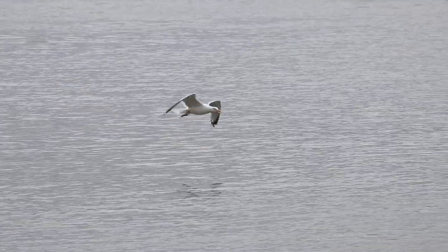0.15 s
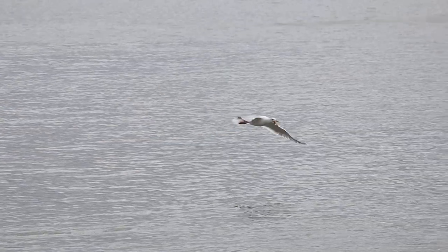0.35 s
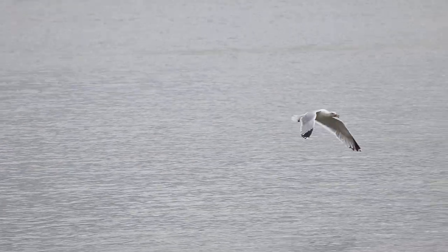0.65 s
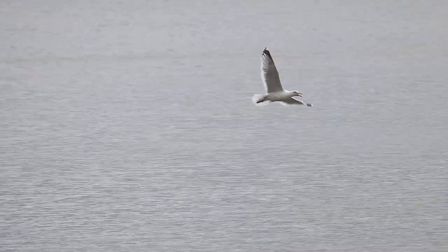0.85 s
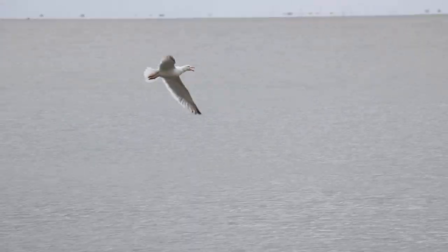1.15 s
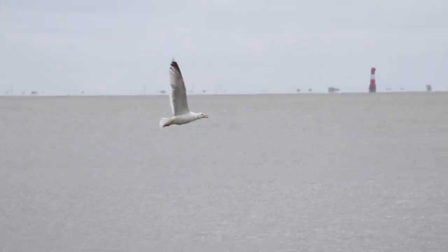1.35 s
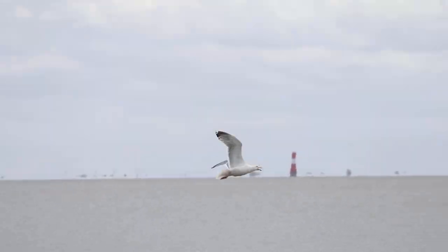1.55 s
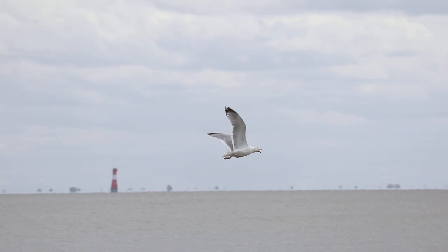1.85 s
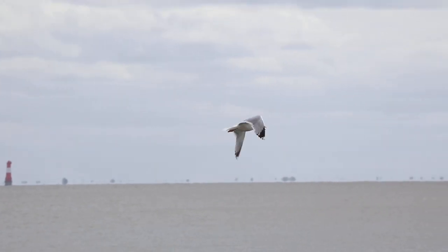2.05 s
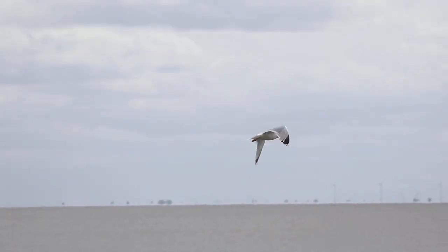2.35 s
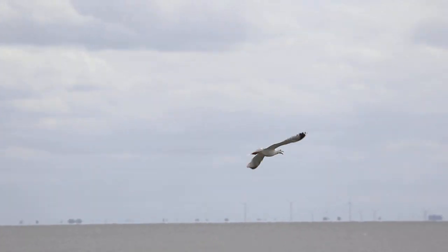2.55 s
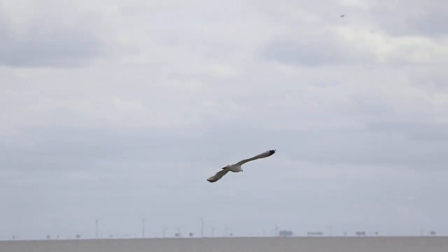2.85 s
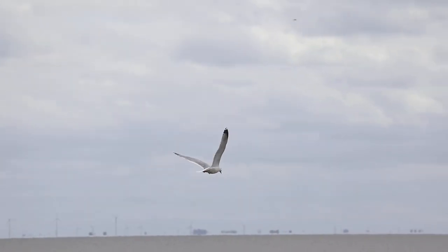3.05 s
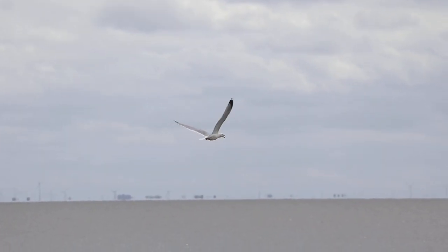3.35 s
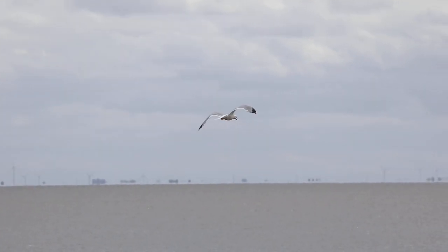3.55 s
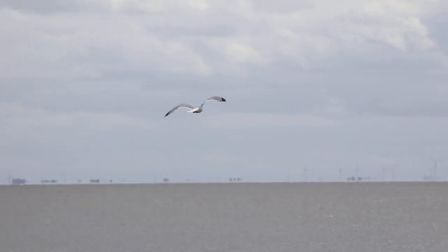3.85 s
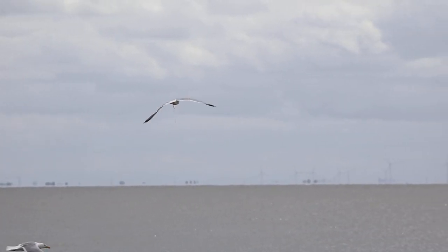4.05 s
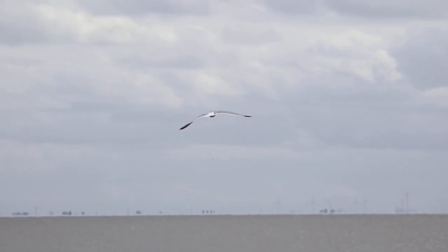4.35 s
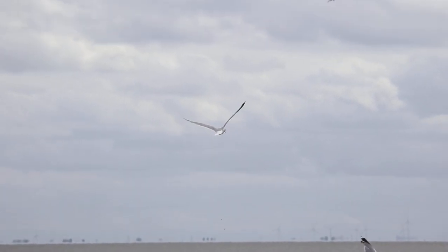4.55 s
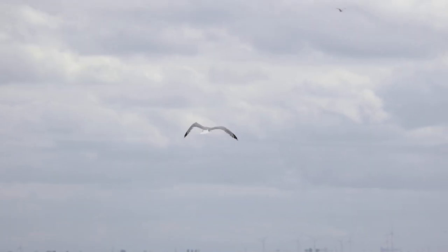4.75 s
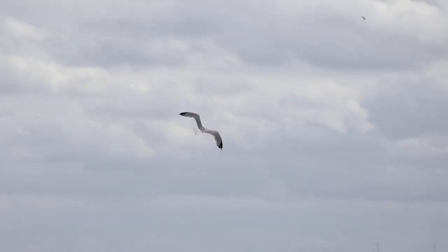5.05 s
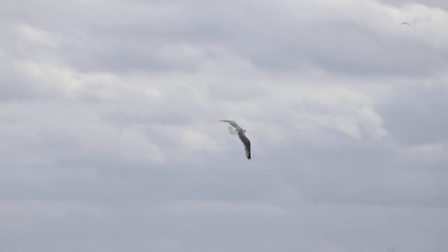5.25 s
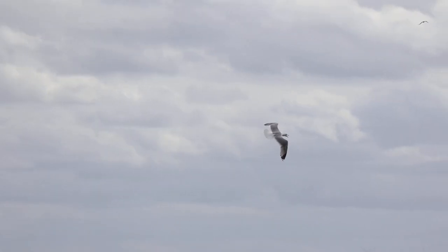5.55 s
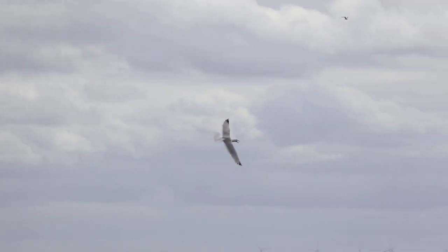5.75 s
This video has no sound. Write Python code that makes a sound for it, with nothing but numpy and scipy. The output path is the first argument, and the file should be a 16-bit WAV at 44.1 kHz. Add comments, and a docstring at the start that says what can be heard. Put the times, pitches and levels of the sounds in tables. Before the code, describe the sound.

Repeated yelping gull calls, each dropping in pitch and breaking hoarsely, over rough low wind rumble and a thin wash of small waves.

```python
"""From the start a gull cries over open water, about every 0.7 s; a second joins at 3.8 s.
Most cries open with a yelp, break on hoarse half lines, hold a falling note and end low; lines are summed sines.
Wind buffets the microphone throughout, hardest near 1 s: shaped noise, pops, spikes and swings.
Small waves hiss wide underneath: noise shaped in time and frequency."""
import sys
import numpy as np
from scipy import signal
from scipy.fft import rfft, irfft, next_fast_len
from scipy.io import wavfile
from scipy.ndimage import uniform_filter1d

SR = 44100
rng = np.random.default_rng(int(sys.argv[2]) if len(sys.argv) > 2 else 0)


def persist_wave(psi):
    """Save psi, clipped to +-1, as 16-bit WAV."""
    counts = np.round(np.clip(psi, -1, 1) * 32767).astype(np.int16)
    wavfile.write(sys.argv[1], SR, np.atleast_2d(counts).T)


N = 259749

# Waves. Each row: time in seconds, relative level in dB, brightness in dB per octave about 3 kHz,
# narrowness in dB (lowers the sides at 3 kHz, less so above).
WAVES = [(0, -52, 2.5, 0.5), (.15, -55, 2.5, 0), (.33, -54, 2, .1), (.9, -53.5, 1.8, -2),
         (1.08, -54.5, 1, -3.5), (1.13, -51, 2.5, -1), (1.24, -47, 4, 3), (1.32, -49.5, 3, -1),
         (1.4, -53.5, 2, -5), (1.6, -52, 2.8, 1), (1.72, -50, 3.2, 2), (1.95, -55, 3, -2),
         (2.3, -53.5, 2, -0.5), (2.551, -54, 2.3, -1.5), (3.0, -55.5, 3, -1.5), (3.3, -55.5, 2.4, -3),
         (3.6, -55.5, 2, -4), (4.0, -55, 1.5, -6), (4.4, -55.5, 2.5, -5.5), (4.8, -55.5, 1.5, -5.5),
         (5.2, -54, 2.5, -5), (5.5, -55, 1.5, -6), (5.89, -53.5, 2.5, -5)]
# Mid and side spectra of the waves. Each row: frequency in Hz, relative density in dB per Hz.
WAVES_MID = [(35, -8), (60, -4.5), (91, -1), (167, 3), (356, -12.5), (587, -18), (1490, -20), (1820, -27),
             (3060, -32), (7450, -49), (8130, -51.5), (9880, -61.5), (10800, -64.5), (14000, -118),
             (22000, -120)]
WAVES_SIDE = [(59, -91.5), (100, -46.5), (176, -27), (246, -12.5), (318, -18.5), (560, -14.5), (1200, -15),
              (1550, -14.5), (2630, -16.5), (4640, -22.5), (10800, -35), (14000, -43.5), (22000, -120)]
PATCH_RMS_DB = 1.1  # unevenness of the hiss

# Wind at the microphone. Each row: time in seconds, relative level in dB,
# sharpness as relative dB of the upper band against the level.
GUSTS = [(0.0, -44, -11), (0.05, -33.5, -21), (0.21, -43.5, -10.5), (0.49, -29, -21), (0.57, -38.5, -8.5),
         (0.59, -24.5, -19.5), (0.69, -27, -11.5), (0.72, -32.5, -22.5), (0.9, -30.5, -21.5),
         (0.949, -23, -5.5), (0.97, -35.5, -22), (1.0, -18, -16), (1.049, -14, -7), (1.111, -18, -8.5),
         (1.15, -29.5, -18.5), (1.28, -22.5, -13.5), (1.31, -42, -16.5), (1.35, -21, -12),
         (1.46, -23, -11.5), (1.54, -26.5, -24.5), (1.57, -36, -22), (1.79, -20.5, -12),
         (1.951, -32, -18.5), (2.0, -20, -13), (2.12, -26.5, -19), (2.17, -23, -13.5), (2.31, -33, -18),
         (2.66, -23, -9.5), (2.87, -25.5, -16), (2.889, -36.5, -13), (3.0, -36, -17), (3.02, -29, -19),
         (3.2, -28, -19), (3.225, -39, -17), (3.25, -37, -18), (3.26, -27.5, -19), (3.3, -37.5, -17),
         (3.39, -37, -20), (3.43, -25.5, -24), (3.51, -30.5, -9), (3.53, -24, -21), (3.71, -30, -18),
         (3.76, -24.5, -28), (3.82, -28.5, -16), (3.94, -25.5, -25), (3.99, -26.5, -15.5),
         (4.04, -19.5, -24.5), (4.17, -43.5, -8.5), (4.35, -46, -5), (4.38, -29.5, -22.5), (4.41, -30, -22),
         (4.425, -37, -21), (4.555, -37, -20), (4.575, -24, -22.5), (4.62, -24, -21), (4.635, -33, -23),
         (4.655, -26, -23), (4.71, -25, -21), (4.72, -35.5, -23), (4.81, -26.5, -20.5), (4.92, -40.5, -18),
         (5.081, -37, -19), (5.12, -35, -20), (5.135, -23, -19), (5.19, -25, -22), (5.205, -37, -22),
         (5.25, -32, -24), (5.38, -38, -16.5), (5.51, -25, -28), (5.54, -38.5, -14), (5.69, -24.5, -27),
         (5.82, -46.5, -3.5), (5.89, -42.5, -7)]
# Single buffets. Each row: time in seconds, relative spike peak in dB, nominal first pitch of the swings in Hz,
# relative level of the swings in dB.
BUFFETS = [(0.047, -36, 135, -32), (0.113, -33, 253, -34.5), (0.145, -39, 175, -41), (0.267, -40, 132, -37),
           (0.302, -38, 207, -37), (0.375, -26, 363, -33), (0.413, -35, 137, -33), (0.429, -30, 128, -30),
           (0.472, -25, 334, -25), (0.507, -25, 202, -28), (0.536, -30, 132, -31), (0.593, -22, 286, -19),
           (0.624, -24, 318, -22.5), (0.64, -17, 280, -23), (0.665, -21, 245, -26), (0.84, -31, 291, -27.5),
           (0.881, -36, 148, -29), (0.926, -23, 235, -23.5), (0.939, -14, 245, -24.5),
           (0.972, -26, 194, -22), (0.995, -21, 331, -21), (1.004, -14, 202, -16), (1.014, -16, 260, -19),
           (1.036, -8, 249, -15), (1.049, -13, 300, -17), (1.073, -11.5, 247, -16), (1.09, -7, 370, -14),
           (1.112, -14, 280, -18), (1.165, -23, 221, -26), (1.203, -19, 260, -24.5), (1.253, -17, 266, -22),
           (1.274, -21, 374, -25), (1.347, -17, 366, -19), (1.364, -12, 460, -24), (1.384, -18, 237, -24),
           (1.393, -15, 330, -22), (1.418, -17.5, 225, -22.5), (1.449, -11, 326, -22),
           (1.474, -21, 300, -23), (1.493, -19, 235, -24), (1.541, -32, 188, -26), (1.586, -32, 121, -33),
           (1.61, -36, 140, -30), (1.636, -34, 153, -27), (1.651, -28, 277, -26),
           (1.712, -17.5, 234, -24.5), (1.754, -18, 450, -20.5), (1.766, -21, 330, -22),
           (1.777, -17, 300, -20), (1.806, -18, 183, -22), (1.826, -24, 300, -28), (1.859, -19.5, 269, -20),
           (1.885, -22, 191, -22.5), (1.94, -34, 191, -30), (1.97, -26, 210, -25), (1.989, -16.5, 246, -20),
           (2.006, -19, 240, -22), (2.019, -18, 260, -21), (2.037, -23, 220, -25), (2.066, -21, 229, -26),
           (2.101, -23, 230, -25), (2.126, -23, 304, -25), (2.149, -21, 409, -23), (2.166, -20, 300, -22),
           (2.188, -22, 280, -24), (2.218, -24, 370, -28), (2.271, -30, 223, -30), (2.317, -26, 345, -32),
           (2.347, -27, 196, -30.5), (2.37, -20, 151, -26.5), (2.402, -26, 409, -29.5),
           (2.494, -21, 282, -25), (2.517, -23, 300, -26), (2.539, -16, 536, -21.5),
           (2.566, -22, 304, -22.5), (2.629, -14, 281, -23.5), (2.643, -19, 330, -23),
           (2.661, -15.5, 409, -26), (2.684, -18, 428, -25), (2.697, -20, 260, -24), (2.719, -21, 250, -24),
           (2.738, -19, 280, -23), (2.757, -21, 260, -24), (2.77, -20, 260, -23), (2.786, -19, 230, -22),
           (2.815, -26, 300, -28), (2.855, -20.5, 406, -21.5), (2.908, -30, 148, -31),
           (2.946, -37, 258, -32), (3.013, -26, 198, -25), (3.044, -28, 315, -29), (3.073, -30, 350, -34),
           (3.104, -27, 221, -30), (3.144, -29.5, 275, -27), (3.165, -26, 310, -27.5),
           (3.184, -24, 215, -27), (3.241, -35, 159, -32), (3.256, -25, 210, -28), (3.305, -34, 277, -30),
           (3.324, -27, 300, -30), (3.427, -20, 374, -24), (3.458, -25.5, 229, -28), (3.502, -20, 304, -25),
           (3.525, -27, 153, -22.5), (3.545, -26, 175, -25.5), (3.576, -24, 200, -26),
           (3.603, -26, 191, -26.5), (3.638, -24, 229, -25.5), (3.66, -28, 156, -25),
           (3.696, -28, 178, -29.5), (3.736, -30, 229, -25.5), (3.751, -27, 205, -26.5),
           (3.78, -27, 226, -25.5), (3.807, -22, 336, -28), (3.833, -34, 215, -29),
           (3.934, -30.5, 220, -26), (3.981, -18.5, 179, -21.5), (4.009, -15, 153, -20.5),
           (4.029, -19, 230, -21), (4.052, -21, 361, -20.5), (4.192, -41, 385, -46), (4.373, -31, 183, -29),
           (4.453, -37, 148, -31), (4.506, -36, 156, -32), (4.565, -24, 207, -19), (4.605, -23, 202, -19),
           (4.657, -27, 156, -23), (4.693, -20, 323, -19), (4.75, -33, 283, -28.5), (4.802, -23, 158, -25),
           (4.842, -37, 194, -32.5), (4.987, -33, 151, -34), (5.0, -29, 390, -34), (5.039, -34, 285, -34),
           (5.093, -32.5, 183, -24), (5.131, -21, 204, -22), (5.147, -23, 200, -24),
           (5.173, -21, 152, -22.5), (5.259, -29, 165, -27.5), (5.326, -35, 180, -28.5),
           (5.434, -27, 253, -27), (5.498, -36, 223, -22.5), (5.59, -39, 213, -33), (5.611, -29, 167, -29),
           (5.626, -25, 167, -27.5), (5.686, -22, 277, -19), (5.721, -30, 164, -25.5),
           (5.77, -37, 186, -38)]
# Low and high wind bands. Each row: frequency in Hz, relative level in dB.
WIND_LOW = [(20, -40.5), (45, -21.5), (90, -6.5), (170, -0.5), (280, 0.5), (420, -6.5), (700, -52),
            (1200, -57.5)]
WIND_HIGH = [(150, -22), (300, -4.5), (450, 6.5), (650, -3.5), (900, -12), (1300, -29), (2000, -59)]
# Stereo difference of the wind. Each row: frequency in Hz, side against mid in dB.
WIND_SIDE = [(60, -60), (125, -36), (190, -32), (330, -18), (590, -12.5), (1050, -4)]
# Spectrum of one small eddy. Each row: frequency in Hz, relative level in dB.
POP_SPECTRUM = [(40, -31), (120, -9.5), (280, -2), (500, -4), (800, -12.5), (1300, -23), (2500, -62)]
# Band passed by the windscreen. Each row: frequency in Hz, gain in dB.
MEMBRANE = [(15, -38), (30, -16.5), (45, -2.5), (80, 3.5), (1100, -3), (1700, -15.5), (2600, -50.5),
            (4000, -96)]
GIVE = 0.85  # saturation limit of the membrane, ahead of its band filter
LUMP_LIMIT_DB = 7  # bound on the lumps of a gust before they are scaled to rms 1
CALM_DB = -35.5  # gust level below which the wind dies away quickly
BUFFET_T60_S = 0.032

# Yelps that open a cry. Each row: bird, start in seconds, end in seconds, first pitch in Hz, last pitch in Hz,
# partials 1, 2 and 3 in dB, half lines in dB, their dullness above the third in dB per line.
# Pitches and levels are bases for the courses below.
YELPS = [("first", .531, .555, 1270, 1500, -27.5, -42, -43, -43, 5),
         ("first", 1.25, 1.274, 1200, 1560, -32, -53, -60, -45, 8),
         ("first", 1.97, 2.0, 1150, 1470, -34.5, -43.5, -60, -47, 9),
         ("first", 2.653, 2.68, 1260, 1480, -29.5, -60, -79, -47, 4),
         ("first", 3.32, 3.348, 1233, 1420, -29.5, -49, -53, -57, 14),
         ("second", 3.838, 3.865, 1120, 1480, -54, -53, -66, -55, 12),
         ("first", 3.992, 4.016, 1260, 1390, -28, -43, -67, -49, 14),
         ("first", 4.735, 4.762, 1180, 1480, -34, -57, -78, -59, 15),
         ("second", 4.775, 4.796, 1200, 1450, -39, -52, -67, -55, 8),
         ("first", 5.355, 5.386, 1170, 1430, -33.5, -62, -75, -62, 15),
         ("second", 5.56, 5.586, 1210, 1460, -37, -60, -53, -51, 8),
         ("second", 5.815, 5.842, 1340, 1350, -35.5, -61, -52, -46, 9)]
# Hoarse breaks on half lines before the long note. Columns as for the yelps.
BREAKS = [("first", .558, .603, 1810, 1720, -42, -34, -59, -38.5, .1),
          ("first", .607, .626, 1640, 1630, -36.5, -29, -41.5, -54, 11),
          ("first", 1.278, 1.318, 1780, 1713, -38, -55, -77, -42, 14),
          ("first", 2.004, 2.023, 1610, 1625, -46.5, -41.5, -77, -47, 14),
          ("first", 2.683, 2.708, 1690, 1660, -55, -48, -72, -51, 9),
          ("first", 3.351, 3.388, 1680, 1660, -43, -67, -84, -52.5, 10),
          ("second", 3.87, 3.918, 1450, 1640, -48, -56, -62, -54, 12),
          ("first", 4.02, 4.058, 1610, 1570, -42, -49, -81, -53.5, 11),
          ("first", 4.766, 4.788, 1585, 1530, -41.5, -62, -70, -59, 15),
          ("second", 4.8, 4.853, 1610, 1640, -48, -57, -55, -49, 9),
          ("second", 5.59, 5.652, 1480, 1667, -46, -54, -51, -54.5, 12)]
# Low ends of a cry. Columns as for the yelps, then time in seconds at which the half lines set in.
ENDS = [("first", .182, .198, 1020, 900, -38, -42, -62, -49, 6, .183),
        ("first", .848, .887, 1050, 940, -40.5, -48, -50, -55, 8, .85),
        ("first", 1.57, 1.612, 1112, 970, -34, -50, -54, -50, 6, 1.583),
        ("first", 2.26, 2.356, 1099, 990, -34.5, -44, -45, -52, 3, 2.323),
        ("first", 2.968, 3.046, 1110, 940, -38, -52.5, -50, -52, 6, 3.015),
        ("first", 3.616, 3.68, 1098, 975, -39, -56.5, -51.5, -53, 6, 3.66),
        ("first", 4.353, 4.434, 1132, 980, -34.5, -56, -46, -53, 8, 4.414),
        ("first", 4.975, 5.066, 1093, 1035, -36, -51.5, -52.5, -60, 8, 5.058),
        ("first", 5.57, 5.682, 1103, 1030, -36, -56, -56, -56, 8, 5.665)]
# Course of each short register. Each row: share of its time, share of the glide, full lift in Hz,
# change in dB of partial 1, of the overtones, of the half lines.
YELP_COURSE = [(0, 0, 0, -12, -22, -22), (.2, .36, 5, -2, -5, -4), (.4, .48, 5.5, 0.5, -0.5, 0.5),
               (.72, 0.62, 5, 0.5, 0.1, -1), (.86, 0.75, -0.5, -6, -14, -15), (1, 1, 0.5, -11, -24, -24)]
BREAK_COURSE = [(0, 0, 0, -1, -4, -4), (.16, 0.1, 45, -1, -1.5, 0), (.7, 0.62, 28.5, -1, -0.5, 0),
                (1, 0.97, -0.5, 2, 2, -4.5)]
END_COURSE = [(0, 0, 0, -3, -4, -3), (.25, 0.378, 0, -0.5, 0.5, 0.1), (.58, 0.565, 0, -4, -3.5, 0.1),
              (.8, .7, 0, -8, -7, 0.1), (1, 1, 0, -15, -13, -5)]
ARCH_S = 0.045  # a register this long gets the full lift
FOURTH_DB = -16.5  # partial 4 against 3 in the short registers
CLEAR_DB = 22  # cut of the half lines while a low end is still clear
# Long falling notes. Each row: bird, partial 4 against 2 at start and at end in dB, half lines at start in dB,
# curve of (time in seconds, pitch in Hz, partials 1, 2 and 3 in dB).
NOTES = [ ("first", -22, -23, -66, [(0.0, 1605, -30.5, -34, -56), (0.106, 1430, -34, -46.5, -72),
         (0.118, 1406, -31.5, -43, -70), (0.148, 1342, -33, -45, -86), (0.158, 1315, -32.5, -57, -63),
         (0.17, 1252, -38, -73, -86), (0.178, 1253, -49, -75, -76)]),
         ("first", -27, -16.5, -62, [(0.63, 1607, -35, -35, -46), (0.638, 1603, -33.5, -32.5, -39),
         (0.678, 1574, -34.5, -33.5, -39.5), (0.764, 1479, -35, -34, -42), (0.78, 1454, -36.5, -37.5, -51),
         (0.792, 1396, -37, -46, -66), (0.81, 1315, -41, -51, -51), (0.832, 1282, -44, -56, -57),
         (0.845, 1256, -55, -65, -66)]), ("first", -33, -20, -52, [(1.322, 1626, -33, -41, -69),
         (1.33, 1611, -36, -39, -61), (1.406, 1567, -36.5, -45, -69), (1.428, 1546, -35, -42, -51.5),
         (1.496, 1490, -33, -44.5, -49.5), (1.538, 1416, -39, -41.5, -51), (1.558, 1340, -37, -53, -80),
         (1.567, 1320, -43, -66, -79)]), ("first", -42, -20, -70, [(2.027, 1590, -43, -38, -63),
         (2.039, 1567, -37.5, -36, -55), (2.111, 1524, -35.5, -38.5, -52), (2.167, 1462, -40, -38.5, -47.5),
         (2.201, 1400, -37.5, -48, -63), (2.223, 1360, -37, -57, -63), (2.251, 1283, -35, -59, -82),
         (2.257, 1260, -40, -71, -74)]), ("first", -40, -31, -67, [(2.712, 1655, -43, -43, -51),
         (2.73, 1590, -37, -43, -50), (2.752, 1556, -34.5, -42, -51), (2.8, 1550, -37, -47, -54),
         (2.818, 1535, -38, -54, -62), (2.894, 1355, -35, -55, -74), (2.944, 1305, -35, -58, -79),
         (2.965, 1295, -37, -68, -79)]), ("first", -26, -24, -58, [(3.392, 1586, -40, -54, -66),
         (3.402, 1580, -35.5, -54, -65), (3.42, 1570, -39, -66, -87), (3.436, 1550, -36.5, -51, -71),
         (3.506, 1485, -36.5, -47, -54.5), (3.584, 1401, -38, -40.5, -58), (3.6, 1350, -36, -43, -61),
         (3.613, 1297, -37, -60, -77)]), ("second", -37, -41, -54, [(3.922, 1630, -53, -48, -64),
         (3.94, 1540, -44, -34, -49), (3.96, 1435, -45, -37, -64), (3.992, 1363, -50, -48, -66),
         (4.045, 1290, -52, -58, -72)]), ("first", -42, -45, -71, [(4.062, 1522, -36, -52, -76),
         (4.076, 1508, -34.5, -49.5, -62), (4.13, 1501, -33.5, -46.5, -63), (4.228, 1499, -32, -46, -62),
         (4.302, 1487, -34.5, -47.5, -61), (4.314, 1470, -33, -43, -54), (4.344, 1358, -33.5, -46, -66),
         (4.35, 1330, -37, -56, -89)]), ("first", -23, -30, -61, [(4.792, 1530, -36, -53, -59),
         (4.838, 1522, -36.5, -57, -66), (4.898, 1490, -40, -51, -63), (4.945, 1384, -35, -59, -70),
         (4.972, 1245, -33, -63, -76)]), ("second", -38, -37, -51, [(4.857, 1585, -46, -40, -40),
         (4.865, 1547, -39, -34, -39), (4.889, 1482, -45, -32.5, -46), (4.937, 1375, -46, -41.5, -57),
         (4.97, 1272, -43, -57, -68)]), ("first", -29, -39, -63, [(5.39, 1610, -51, -67, -79),
         (5.402, 1597, -40.5, -58, -88), (5.428, 1562, -34, -55, -65), (5.49, 1492, -38.5, -56, -70),
         (5.512, 1467, -39, -50, -81), (5.548, 1395, -38, -50, -81), (5.567, 1254, -35, -55, -59)]),
         ("second", -19, -32, -63, [(5.656, 1550, -38, -30.5, -42), (5.668, 1500, -38, -28, -41),
         (5.698, 1456, -41, -29, -43), (5.736, 1400, -46, -34, -47), (5.76, 1348, -46, -39.5, -52),
         (5.784, 1290, -44, -57, -65), (5.8, 1205, -47, -66, -77)]),
         ("second", 0, -27, -67, [(5.846, 1365, -38, -66, -72), (5.858, 1290, -31.5, -45, -50),
         (5.889, 1166, -26, -40, -48)]), ]
SETTLE_DB, SETTLE_S = 21.5, 0.058  # drop of the half lines in a long note, and its time
# Bearing of each bird by name. Each row: time in seconds, left against right in dB.
BEARING = {"first": [(.1, .3), (.6, 0.53), (1.26, .05), (1.4, 0.7), (1.6, 0.2), (2.0, 0.3), (2.2, 0),
           (2.8, -0.2), (3.5, .5), (4.25, 0.7), (4.9, .9), (5.5, 0.7)], "second": [(3.9, 0), (4.8, 1),
           (4.86, -1.5), (4.9, 0.9), (5.6, -0.5), (5.7, -0.4), (5.86, 1.1)]}
# Colour of partials 5 and up against 4. Each row: frequency in Hz, relative level in dB.
THROAT = [(600, -8.5), (1500, 5.3), (3300, 0), (4800, -4), (7000, -17.5), (10000, -30.5), (13000, -46.5)]
# Colour of the half lines against the second of them. Each row: frequency in Hz, relative level in dB.
HALVES = [(600, -8.5), (1500, 2), (2000, 0.5), (2500, 3), (3400, 5), (4300, -2.5), (7000, -16),
          (10000, -30.5), (13000, -46.5)]
# Creak of the slack syrinx before a yelp. One row: lead in seconds, level against partial 1 in dB,
# length in seconds, centre in Hz, first and last pulse rate in Hz, share of air 0-1.
RASP_START = (.021, -15, .019, 1250, 520, 640, .3)
# Croaks after the voice has broken off. Each row: time in seconds, level in dB, length in seconds, centre in Hz.
CROAKS = [(.199, -48, .016, 1500), (.891, -51, .014, 2300), (1.615, -45, .022, 1050),
          (2.359, -50, .018, 1800), (3.04, -52, .02, 1400), (3.68, -49, .02, 1300), (4.438, -46, .02, 1300),
          (5.068, -47, .024, 1200), (5.685, -53, .015, 1600), (5.798, -45, .022, 1200)]
# Pulses of every croak. One row: first and last pulse rate in Hz, share of air 0-1.
CROAK_PULSES = (520, 430, .4)
# Puff as the loudest break snaps into its note. One row: time in seconds, level in dB, length in seconds,
# centre in Hz, first and last pulse rate in Hz, share of air 0-1.
CRACK = (.623, -45, .009, 3500, 520, 520, .9)


def gain_of(db):
    """Decibels to amplitude."""
    return 10 ** (np.asarray(db) / 20)


def evened(x):
    """Scales to rms 1."""
    return x / np.sqrt(np.mean(x ** 2) + 1e-20)


def read(points, hz):
    """Reads a spectrum on a log-frequency axis."""
    f, value = np.transpose(points)
    return np.interp(np.log(hz + 1), np.log(f + 1), value)


def colour(x, *spectra):
    """Filters by the sum of some spectra in dB."""
    size = next_fast_len(N)
    hz = np.fft.rfftfreq(size, 1 / SR)
    gain = gain_of(sum(read(s, hz) for s in spectra))
    return irfft(rfft(x, size) * gain, size)[:N]


def wander(count, speed_hz):
    """Slow random curve of rms 1."""
    span = max(int(SR / speed_hz / 2), 2)
    return evened(uniform_filter1d(uniform_filter1d(rng.standard_normal(count), span), span))


def add(mix, start_s, sound):
    """Mixes a sound in at its start time."""
    part = mix[..., round(start_s * SR):][..., :sound.shape[-1]]
    part += sound[..., :part.shape[-1]]


def waves():
    """Wide hiss of small waves: noise spectra in random patches, with moving level, brightness and width."""
    frames, hz = N // 256 + 5, np.fft.rfftfreq(1024, 1 / SR)
    s, level_db, tilt_db, narrow_db = np.transpose(WAVES)
    t = np.arange(frames) * 256 / SR
    a, b, c, d, patches = rng.standard_normal((frames, 513, 5)).T
    patches = evened(uniform_filter1d(uniform_filter1d(patches, 12, 0), 12, 1))
    octaves = np.log2(np.maximum(hz, 500) / 3000)[:, None]
    swell_db = np.interp(t, s, level_db) + octaves * np.interp(t, s, tilt_db)
    swell = gain_of(swell_db + PATCH_RMS_DB * patches)
    mid = (a + 1j * b) * gain_of(read(WAVES_MID, hz))[:, None]
    width_db = np.interp(t, s, narrow_db) * (-1 + 0.51 * octaves)
    side = (c + 1j * d) * gain_of(read(WAVES_SIDE, hz)[:, None] - 14.0 + width_db)
    band = (hz > 1800) & (hz < 8000)  # levels refer to the mid in this band
    band_noise = signal.istft(mid * band[:, None], nperseg=1024, noverlap=768)[1]
    scale = np.sqrt(np.mean(band_noise ** 2))
    spectrum = np.array([mid + side, mid - side]) * swell * gain_of(-3.0) / scale
    return signal.istft(spectrum, nperseg=1024, noverlap=768)[1][:, :N]


def wind():
    """Eddies press on the membrane in lumps and pops; strong ones are sharper and differ more between the ports."""
    s, level_db, sharp_db = np.transpose(GUSTS)
    t = np.arange(N) / SR
    lump_db = 3.6 * wander(N, 25) + 4.6 * wander(N, 120)
    lumps = evened(gain_of(LUMP_LIMIT_DB * np.tanh(lump_db / LUMP_LIMIT_DB)))
    gust_db = np.interp(t, s, level_db)
    gust = gain_of(gust_db - 6.2 - 1.1 * np.maximum(CALM_DB - gust_db, 0)) * lumps
    sharpness_db = np.interp(t, s, sharp_db)
    sharp = gain_of(sharpness_db + 9.5) * lumps ** 0.53
    low, high, low_side, high_side = rng.standard_normal((4, N))
    push, snap = colour(low, WIND_LOW), colour(high, WIND_HIGH)
    depth = np.clip(-0.03 * sharpness_db - 0.54, -0.3, 0.6)  # dull gusts are deeper
    heave = evened(uniform_filter1d(push, size=200)) * depth
    pop_size = gain_of(4.0 * np.minimum(rng.exponential(1, N), 3))
    clicks = (rng.random(N) < 90 / SR) * rng.choice([-1, 1], N) * pop_size  # 90 per second on average
    pops = gain_of(-5.5) * sharp ** 0.72 / lumps * evened(colour(clicks, POP_SPECTRUM))
    mid = gust * (evened(push) + heave + sharp * evened(snap) + pops)
    side_push = colour(low_side, WIND_LOW, WIND_SIDE) / push.std()
    side_snap = colour(high_side, WIND_HIGH, WIND_SIDE) / snap.std()
    side = gust * (side_push + sharp * side_snap)
    return np.array([mid + side, mid - side])


def buffets():
    """Each buffet is a spike on the membrane, blunter when weak or in a dull gust, with decaying swings."""
    out, t = np.zeros(N), np.arange(SR // 8) / SR
    gust_s, _, sharp_db = np.transpose(GUSTS)
    for (s, spike_db, hz, swing_db), draw in zip(BUFFETS, rng.standard_normal(len(BUFFETS))):
        shape = (1 - np.exp(-t / 0.0015)) * gain_of(swing_db + 8.0 - 60 * t / BUFFET_T60_S)
        swings = shape * np.cos(2 * np.pi * hz * (t - 0.003) * (1 - 4.3 * t) + 0.8 * draw)  # pitch falls
        blunt_db = -0.1 * (spike_db + 14) - 0.25 * (np.interp(s, gust_s, sharp_db) + 12)
        u = (t - 0.003) / (0.0004 * gain_of(blunt_db))
        spike = gain_of(spike_db + 1.2) * (1 - u ** 2) * np.exp(-u ** 2 / 2)
        add(out, s, swings + spike)
    return out


def membrane(pressure, lean=0.35):
    """The capsule gives way less under hard pushes and passes only low wind; the left port is more exposed."""
    left, right = (colour(GIVE * np.tanh(p / GIVE), MEMBRANE) for p in pressure)
    tilt = lean * colour((left + right) / 2, WIND_SIDE)
    return np.array([left + tilt, right - tilt])


def rasp(start_s, db, length_s, centre_hz, from_hz, to_hz, airy, sharp=1.1):
    """Slow uneven pulses and puffs of air from the slack syrinx, through a wide throat resonance."""
    t = np.arange(0, length_s, 1 / SR)
    rate_hz = np.linspace(from_hz, to_hz, len(t)) * (1 + 0.07 * wander(len(t), 300))
    turns = np.cumsum(rate_hz) / SR
    pulses = uniform_filter1d(uniform_filter1d(np.exp(-(turns % 1) / 0.12), size=7), size=5)
    puffs = uniform_filter1d((0.4 + np.exp(-(turns % 1) / 0.3)) * rng.standard_normal(len(t)), size=4)
    source = (1 - min(airy, 1)) * evened(np.diff(pulses, prepend=1)) + airy * evened(puffs)
    b, a = signal.iirpeak(centre_hz, sharp, SR)
    voiced = signal.lfilter(b, a, signal.lfilter(b, a, source))
    return start_s, gain_of(db) * evened(voiced) * np.sin(np.pi * t / length_s)


def short(row, course):
    """One short register: its row bent along the course of its kind."""
    _, start, end, from_hz, to_hz, one_db, two_db, three_db, half_db, dull_db = row
    lift = min((end - start) / ARCH_S, 1) ** 2
    rows = []
    for u, glide, lift_hz, low_db, up_db, odd_db in course:
        hz = from_hz + glide * (to_hz - from_hz) + lift_hz * lift
        rows.append((start + u * (end - start), hz, one_db + low_db, two_db + up_db, three_db + up_db,
                     three_db + up_db + FOURTH_DB, half_db + odd_db, dull_db))
    return rows


def low_end(row):
    """One low end: clear at first, then suddenly hoarse."""
    *head, hoarse_s = row
    rows = np.array(short(head, END_COURSE))
    onset = np.clip(hoarse_s + np.array([-0.004, 0.003]), rows[0, 0], rows[-1, 0])
    s = np.sort(np.r_[rows[:, 0], onset])
    rows = np.array([np.interp(s, rows[:, 0], column) for column in rows.T]).T
    rows[:, 6] -= CLEAR_DB * (s < hoarse_s)
    return rows


def held(row):
    """One long note: the fourth partial follows the second, half lines fade."""
    _, four_db, four_end_db, half_db, curve = row
    span = [curve[0][0], curve[-1][0]]
    rows = []
    for s, hz, one_db, two_db, three_db in curve:
        fourth_db = two_db + np.interp(s, span, [four_db, four_end_db])
        fading_db = half_db - SETTLE_DB * min((s - span[0]) / SETTLE_S, 1)
        rows.append((s, hz, one_db, two_db, three_db, fourth_db, fading_db, 14.0))
    return rows


def registers(bird):
    """All registers of one bird in time order, with its bearing."""
    parts = [short(row, YELP_COURSE) for row in YELPS if row[0] == bird]
    parts += [short(row, BREAK_COURSE) for row in BREAKS if row[0] == bird]
    parts += [low_end(row) for row in ENDS if row[0] == bird]
    parts += [held(row) for row in NOTES if row[0] == bird]
    parts.sort(key=lambda part: part[0][0])
    bearing = np.transpose(BEARING[bird])
    return [[(*row, np.interp(row[0], *bearing)) for row in part] for part in parts]


def cries(parts, swoop_s=0.016, slack=0.86, fade_db=20.5):
    """Joins registers that follow at once; each cry swoops up from a slack syrinx and sags back to it."""
    joined = []
    for rows in parts:
        if joined and rows[0][0] - joined[-1][-1][0] < 0.01:
            joined[-1] += list(rows)
        else:
            joined.append(list(rows))
    for rows in joined:
        rows = np.array(sorted(rows))
        ends = rows[[0, -1]]
        ends[:, 0] += [-swoop_s, swoop_s]
        ends[:, 1] *= slack
        ends[:, 2:7] -= fade_db
        yield np.vstack([ends[:1], rows, ends[1:]])


def cry(rows, fall_db, lag_s_per_db, shimmer_db=0.9, jitter=0.0036, edge_s=0.0037):
    """One cry: partials of the syrinx, and half lines when strong and weak pulses alternate."""
    s, *columns = np.transpose(rows)
    t = np.arange(max(s[0], 0), s[-1], 1 / SR)
    hz, one_db, two_db, three_db, four_db, half_db, dull_db, pan_db = (np.interp(t, s, c) for c in columns)
    steep_db = fall_db + 0.6 * np.maximum(-56.0 - four_db, 0)  # a weaker voice is darker on top
    # uneven pulses come with half lines
    hoarse = np.clip(0.3 * gain_of(half_db - np.maximum(one_db, two_db)), 0, 0.3)
    shake = (1 + 4.0 * hoarse) * wander(len(t), 120) + wander(len(t), 25)
    turns = np.cumsum(hz * (1 + jitter * shake)) / SR
    lines = [(1, one_db), (2, two_db), (3, three_db)]
    for k in range(5):
        throat_db = read(THROAT, (k + 4) * hz) - read(THROAT, 4 * hz)
        lines.append((k + 4, four_db - steep_db * k + throat_db))
    for k in range(8):
        throat_db = read(HALVES, (k + 1 / 2) * hz) - read(HALVES, 3 / 2 * hz)
        lines.append((k + 1 / 2, half_db + throat_db - max(k - 2, 0) * np.maximum(dull_db, 0)))
    out = np.zeros((2, len(t)))
    for k, db in lines:
        size = np.sqrt(2) * gain_of(db + shimmer_db * wander(len(t), 49))
        size = size * (1 + hoarse * wander(len(t), 310))
        phase = 2 * np.pi * (k * turns + rng.random())
        lag = np.pi * k * hz * lag_s_per_db * pan_db  # the louder channel trails slightly
        out += size * np.array([np.sin(phase - lag), np.sin(phase + lag)])
    edges = np.clip(np.minimum(t - t[0], s[-1] - t) / edge_s, 0, 1)
    return t[0], out * edges * gain_of([pan_db / 2, -pan_db / 2])


def gulls():
    """Both birds with creaks and croaks, and a faint scattered echo off the water."""
    out = np.zeros((2, N))
    for rows in cries(registers("first")):
        add(out, *cry(rows, fall_db=-2.5, lag_s_per_db=2.1e-5))
    for rows in cries(registers("second")):
        add(out, *cry(rows, fall_db=4.0, lag_s_per_db=3.1e-5))
    lead_s, db, *puff = RASP_START
    for row in YELPS:
        add(out, *rasp(row[1] - lead_s, row[5] + db, *puff))
    for row in CROAKS:
        add(out, *rasp(*row, *CROAK_PULSES))
    add(out, *rasp(*CRACK, sharp=0.5))
    t = np.arange(SR // 4) / SR
    tail = rng.standard_normal((2, len(t))) * gain_of(-60 * t / 0.084)  # T60 84 ms
    echo = signal.fftconvolve(out, tail / np.linalg.norm(tail[0]), axes=1)[:, :N]
    return out + gain_of(-30.5) * echo


def scene():
    """Cries over wind and water."""
    return waves() + membrane(wind() + buffets()) + gulls()


def record(dry):
    """The band limit of the camera: a linear-phase low-pass at 15150 Hz."""
    taps = signal.firwin(511, 15150, window=("kaiser", 9), fs=SR)
    padded = np.pad(dry, ((0, 0), (255, 255)), "reflect")
    return signal.oaconvolve(padded, taps[None], "valid")


dry = scene()
out = record(dry)
persist_wave(out)
```